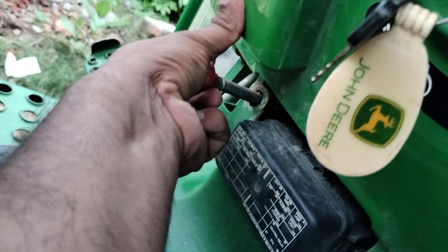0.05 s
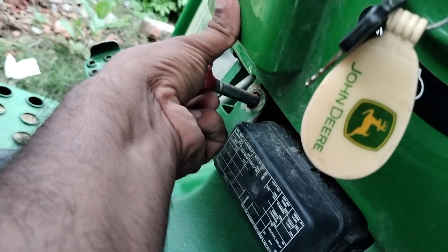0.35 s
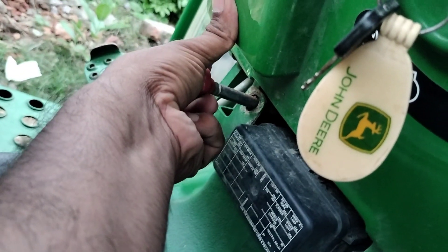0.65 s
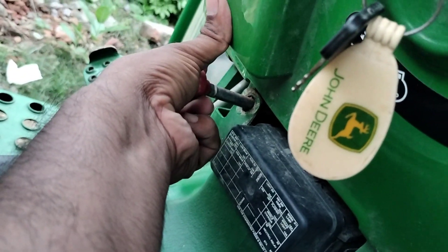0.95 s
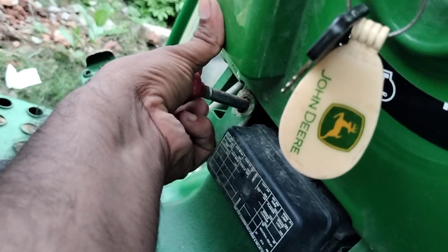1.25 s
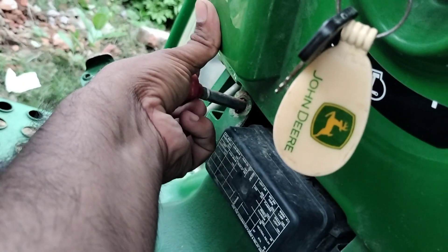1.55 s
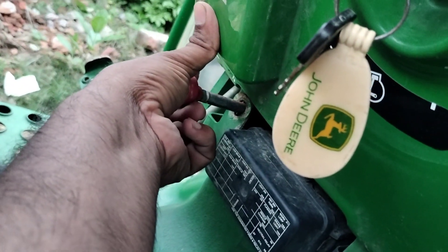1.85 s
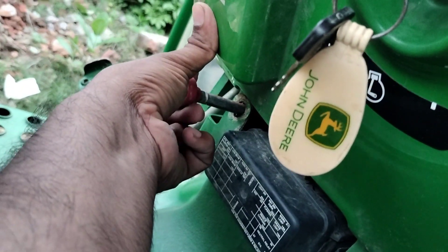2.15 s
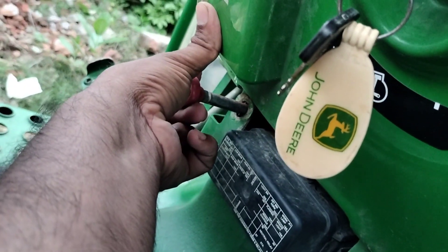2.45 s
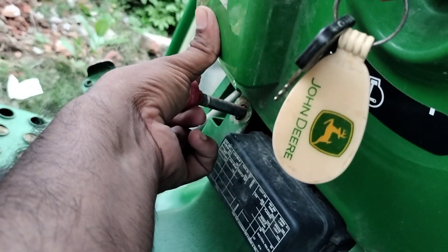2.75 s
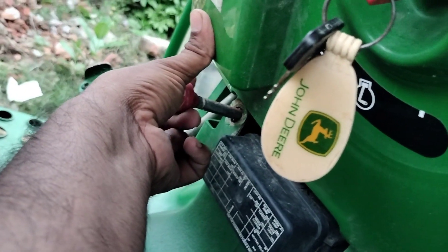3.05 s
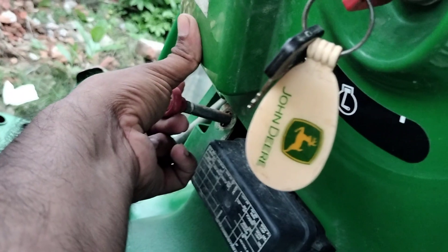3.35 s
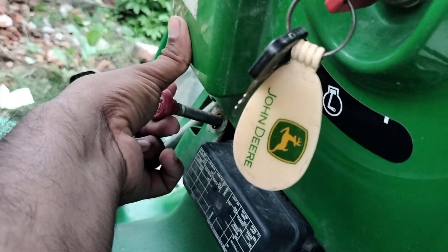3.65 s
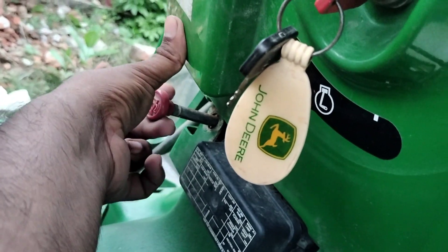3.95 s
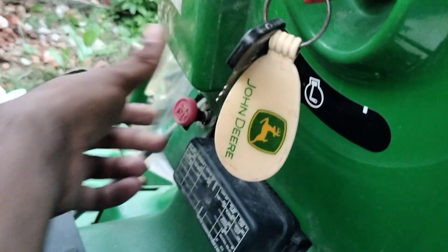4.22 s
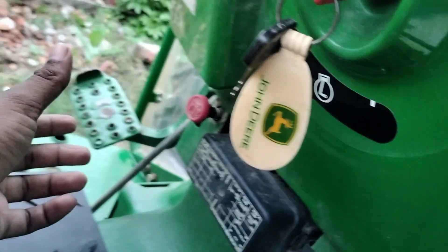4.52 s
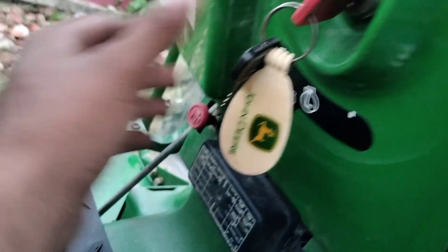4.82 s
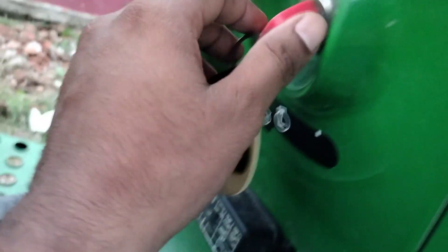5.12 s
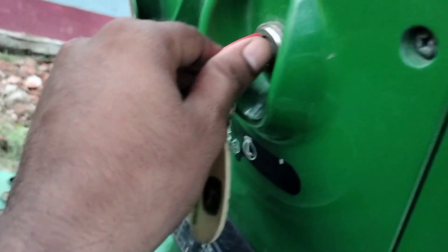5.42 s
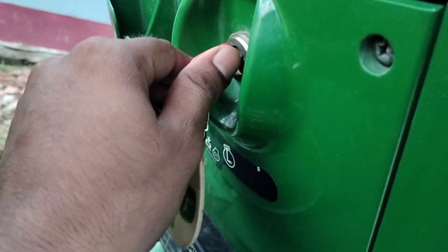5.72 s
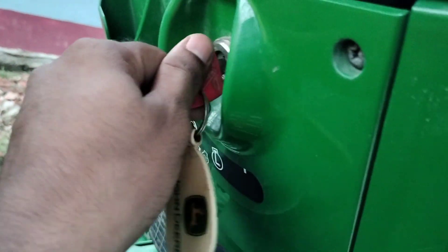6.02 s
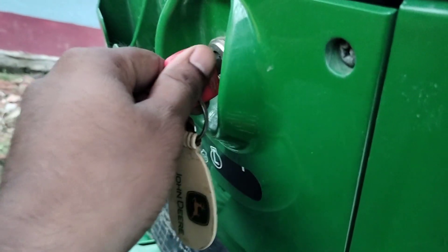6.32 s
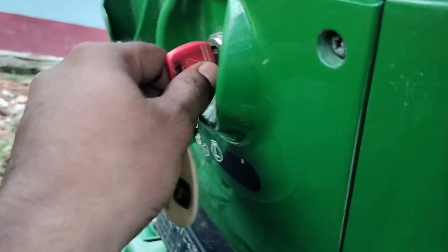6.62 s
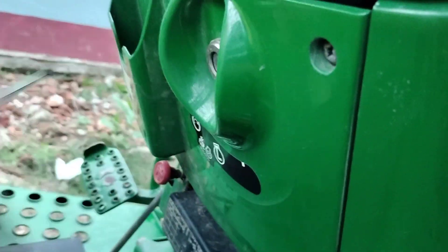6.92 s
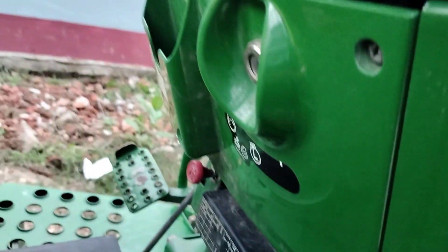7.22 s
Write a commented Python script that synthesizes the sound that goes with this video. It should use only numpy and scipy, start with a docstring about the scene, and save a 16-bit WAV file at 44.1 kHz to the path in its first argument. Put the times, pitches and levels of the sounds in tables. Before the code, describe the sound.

A tractor's clattering diesel engine slows to a stop, then a knob scrapes home and a key clicks out of the ignition.

```python
"""A clacking tractor diesel coasts to a stop, heard at the dashboard; the stop knob has cut its fuel.
Gear backlash slams shut around each compression, ever more slowly, until the crank rocks back and rests.
The released knob's rod scrapes home by stick-slip and leaves its spring ringing.
Then the key is switched off and pulled out: lock clicks shake the dashboard and the key ring jingles."""
import sys
import numpy as np
from scipy import signal
from scipy.fft import rfft, irfft
from scipy.io import wavfile
from scipy.ndimage import uniform_filter1d

SR = 44100
rng = np.random.default_rng(int(sys.argv[2]) if len(sys.argv) > 2 else 0)


def generate_wav(sig):
    """Save sig (samples, or channels by samples) to the path in sys.argv[1] as 16-bit PCM at SR."""
    pcm = np.round(np.clip(np.atleast_2d(sig).T, -1, 1) * 32767).astype(np.int16)
    wavfile.write(sys.argv[1], SR, pcm)


N = 320474
TIME = np.arange(N) / SR

# Pistons passing peak compression. Each row: time in seconds, gear clatter in dB, block thud in dB.
CRESTS = [(0.04, -28.5, -28), (0.121, -28, -27.5), (0.205, -28, -26.5), (0.294, -30.5, -30),
          (0.388, -28.5, -25), (0.483, -29.5, -28), (0.585, -31, -32.5), (0.704, -28.5, -24),
          (0.826, -31, -26.5), (0.966, -33, -28.5), (1.128, -30.5, -26.5), (1.336, -33.5, -29),
          (1.573, -45.5, -39.5), (1.838, -45, -44), (2.143, -48.5, -36.5), (2.475, -40.5, -33.5),
          (2.842, -52, -37.5), (3.255, -63, -55), (3.572, -65.5, -50)]
# Engine run-down. Each row: time in seconds, block churn in dB, exhaust and intake boom in dB.
RUN_DOWN = [(0.0, -20.5, -21.5), (0.06, -23.5, -33.5), (0.18, -22.5, -26), (0.79, -30, -36),
            (0.83, -27, -43), (1.14, -31, -32.5), (1.17, -26.5, -39), (1.32, -31.5, -33.5),
            (1.42, -35, -40), (1.85, -36, -39.5), (1.88, -39, -47), (2.22, -40.5, -46),
            (3.46, -49.5, -53.5), (3.48, -52, -68), (3.62, -62, -44.5), (4.05, -58, -50.5)]
# Spectra of dashboard, panel, metal clicks and bright ticks. Each row: frequency in Hz, level in dB.
DASH_SPECTRUM = [(25, -35), (55, -34), (110, -12), (180, 0.5), (260, -3.5), (400, -8), (520, -10.5),
                 (1200, -64)]
PANEL_SPECTRUM = [(250, -15.5), (500, -18), (700, -2.5), (930, -0.5), (1080, -22), (1400, -18.5),
                  (2200, -54.5)]
CLICK_SPECTRUM = [(600, -2), (1400, -2.5), (2200, -1), (3200, -2), (4300, -2.5), (5500, -6.5), (7500, -12),
                  (9500, -26)]
TICK_SPECTRUM = [(4000, 0), (7500, 2), (9000, -10.5), (11000, 1.5), (12500, -6.5), (15500, -2)]
# The knob's return spring. Each row: frequency in Hz, level in dB, T60 in seconds.
SPRING_MODES = [(792, -1.5, 1.7), (796, -2.5, 2.4), (820, -4.5, 1.1), (831, 2, 1.2), (882, -6, 3.3),
                (900, -10, 1.1), (966, -7, 1.3), (993, -11.5, 1.7)]
# Stereo width. Each row: frequency in Hz, side minus mid in dB.
STEREO_WIDTH = [(30, -12), (170, -16), (350, -8.5), (700, -2), (1300, 0), (16000, -0.5)]


def engine():
    """The slowing crank excites the block, the gear train and thin rattling metal."""
    # Each row: frequency in Hz, level in dB.
    block_spectrum = [(70, -63), (160, -10.5), (250, -0.5), (450, -2), (700, -3), (900, -8.5),
                      (1150, -19.5), (2500, -57.5)]
    gear_spectrum = [(300, -24), (800, -0.5), (1200, -2.5), (2000, -2), (3100, -4), (4000, -7),
                     (5500, -23.5), (7000, -32), (9000, -61)]
    rattle_spectrum = [(1500, -27), (4000, 1), (5500, 6), (7000, -1), (8200, -11.5), (9300, -19.5),
                       (12000, -17.5), (16000, -29)]
    # Each row: frequency in Hz, width in Hz, lift in dB.
    block_resonances = [(254.6, 11, 4.5), (394.8, 42.5, 7.55), (439, 21, 3.6), (577, 21, 6.1), (640, 31, 4),
                        (733, 54, 1.8)]
    gear_resonances = [(1290, 20, 4.8), (1405, 19, 8.6), (1690, 220, 3.7), (1970, 24, 6.1), (2487, 68, 4.8),
                       (2860, 51, 1.6), (3120, 84, 2.1)]
    block = body(block_spectrum, block_resonances)
    gears = body(gear_spectrum, gear_resonances, ripple_db=1.5)
    parts = block, gears, body(rattle_spectrum, ripple_db=4)
    return clacks(parts) + loose_panels(parts) + churning(parts)


def clacks(parts):
    """Each stroke throws the backlash twice and seats a valve; clacks get crisper as the crank slows."""
    # Each row: time in seconds, gear clatter in dB, block thud in dB.
    catches = [(0.065, -31, -31), (0.147, -28.5, -32), (0.235, -27.5, -24.5), (0.321, -30, -24.5),
               (0.416, -26.5, -24), (0.516, -26.5, -25), (0.625, -28, -29), (0.745, -28, -28.5),
               (0.874, -27, -29), (1.02, -29, -29), (1.189, -27.5, -23.5), (1.419, -29, -26),
               (1.689, -25, -23.5), (1.988, -32, -29.5), (2.295, -28.5, -24.5), (2.648, -34, -29),
               (3.028, -32.5, -28.5), (3.401, -49.5, -39), (3.775, -66.5, -43.5)]  # the next compression catches the crank
    grazes = [(2.284, -38, -43), (3.005, -44.5, -31.5)]  # teeth touch just before a slow catch
    _, gears, _ = parts
    out, churn = np.zeros((2, N)), run_down_gain(column=1)
    strokes_s = np.gradient([row[0] for row in catches])
    valves_db = -21.5 + 4.5 * rng.standard_normal(len(CRESTS))  # relative to the churn
    for crest, catch, stroke_s, valve_db in zip(CRESTS, catches, strokes_s, valves_db):
        (crest_s, *crest_db), (catch_s, *catch_db) = crest, catch
        fast_slow_s = [0.18, 0.33]
        rise_s = np.interp(stroke_s, fast_slow_s, [0.0021, 0.00042])
        crest_hz = np.interp(stroke_s, fast_slow_s, [1640, 1990])
        catch_hz = np.interp(stroke_s, fast_slow_s, [3020, 1990])
        add(out, crest_s, clack(parts, *crest_db, rise_s, crest_hz))
        add(out, catch_s, clack(parts, *catch_db, rise_s, catch_hz))
        valve_s = catch_s + 0.36 * stroke_s
        tap = blow(gears, valve_db, rise_s=0.0033, t60_s=0.096, tail_db=-16, tail_s=0.38, grain_db=3.5)
        if valve_s < CRESTS[-1][0]:
            add(out, valve_s, np.interp(valve_s, TIME, churn) * tap)
    for at_s, gear_db, thud_db in grazes:
        add(out, at_s, clack(parts, gear_db, thud_db, rise_s=0.001, peak_hz=1990))
    return out


def clack(parts, gear_db, thud_db, rise_s, peak_hz):
    """Backlash slams shut: light parts answer at once, the heavy block milliseconds later."""
    block, gears, rattle = parts
    gears = emphasise(gears, peak_hz, width_hz=550, lift_db=4.5)
    full_clack_db = -28
    rattle_db = -46 + 1.3 * (gear_db - full_clack_db)  # thin metal fades faster than the gears
    thud = blow(block, thud_db, rise_s + 0.0045, t60_s=0.22, tail_db=-16, tail_s=0.56, grain_db=2)
    clatter = blow(gears, gear_db, rise_s, t60_s=0.11, tail_db=-18.5, tail_s=0.42, grain_db=-0.5)
    buzz = blow(rattle, rattle_db, rise_s / 2, t60_s=0.1, tail_db=-30, tail_s=0.3, grain_db=-1)
    return thud + clatter + buzz


def churning(parts):
    """While the crank turns, the block churns, valve gear chatters, pipes boom and the chassis heaves."""
    # Each row: frequency in Hz, level in dB.
    chassis_spectrum = [(10, -18), (25, -16), (52, 4), (68, -5), (110, -51), (300, -84)]
    pipe_spectrum = [(35, -36.5), (65, -6), (85, -1.5), (150, -0.5), (200, -2.5), (300, -16.5), (900, -68)]
    # Each row: frequency in Hz, width in Hz, lift in dB.
    pipe_resonances = [(75.7, 6.1, 5.4), (119, 6.3, 4.7), (149.3, 20, 6.2)]
    block, gears, rattle = parts
    churn_gain, boom_gain = run_down_gain(column=1), run_down_gain(column=2)
    chatter = gain(-36.5) * steady(gears, grain_db=4, grain_s=0.005)
    chatter += gain(-51) * steady(rattle, grain_db=6.5, grain_s=0.0024)
    running_db, chatter_power = -25.5, 1.38  # chatter dies sooner than the churn
    chatter *= (churn_gain / gain(running_db)) ** chatter_power
    chatter *= held(0, 3.22, attack_s=1, release_s=0.088)
    heave_db = 4 * np.cos(2 * np.pi * (stroke_phase() - 0.81))
    speed = uniform_filter1d(np.gradient(stroke_phase()), size=8000).clip(0)
    shake = gain(-34 + heave_db) * steady(body(chassis_spectrum), grain_db=4, grain_s=0.033)
    shake *= (speed / speed.max()) ** 2
    churn = gain(-2) * churn_gain * steady(block, grain_db=2.5, grain_s=0.008)
    churn *= held(0, 3.28, attack_s=1, release_s=0.22)
    pipes = body(pipe_spectrum, pipe_resonances)
    boom = gain(1) * boom_gain * steady(pipes, grain_db=-1.5, grain_s=0.015)
    return churn + boom + chatter + shake


def loose_panels(parts):
    """Sheet metal, shaken by the engine, buzzes against the frame."""
    # Each row: start in seconds, level in dB.
    bursts = [(0.276, -42), (0.357, -37.5), (0.445, -45.5), (0.691, -45.5), (1.249, -43.5), (1.279, -56),
              (1.366, -46.5), (1.955, -56.5), (2.174, -61.5), (2.606, -63), (3.174, -70)]
    block, gears, rattle = parts
    out = np.zeros((2, N))
    for at_s, db in bursts:
        buzz = blow(rattle, db, rise_s=0.0013, t60_s=0.1, tail_db=-24, tail_s=0.3, grain_db=-1.5)
        clatter = blow(gears, db + 4, rise_s=0.0026, t60_s=0.16, tail_db=-12, tail_s=0.43, grain_db=0.5)
        thud = blow(block, db + 12, rise_s=0.014, t60_s=0.23, tail_db=-20, tail_s=0.36, grain_db=2.5)
        add(out, at_s, buzz + clatter + thud)
    return out


def rocking():
    """The crank is thrown back and the engine lurches, each time in one low chassis mode."""
    # Each row: start in seconds, pitch in Hz, level in dB.
    lurches = [(1.754, 74, -34), (3.04, 85.8, -45.5), (3.189, 73, -49), (3.6, 90, -43), (3.8, 85.2, -39.5),
               (3.94, 82.6, -47)]
    out, t = np.zeros((2, N)), np.arange(SR // 2) / SR
    peak_s = 0.03
    swell = t / peak_s * np.exp(1 - t / peak_s)
    for at_s, hz, db in lurches:
        add(out, at_s, np.outer([1, 0.1], gain(db) * swell * np.sin(2 * np.pi * hz * t)))
    return out


def stop_knob():
    """The rod sticks and slips through its guide, squeals and hits home; the return spring rings on."""
    # Each row: frequency in Hz, level in dB.
    rod_spectrum = [(100, -22), (220, 8.5), (600, -23), (950, 10.5), (1150, -27), (1550, -15), (2000, -2),
                    (3000, -4), (3700, -13), (4200, -6), (6000, -11), (8200, -25), (9300, -33),
                    (12500, -21), (16000, -41)]
    # Each row: frequency in Hz, level in dB, T60 in seconds.
    rod_modes = [(425.4, 2.5, 0.23), (648.5, -2, 0.26), (804, -1.5, 0.17), (870, -14, 0.11),
                 (1277, -2, 0.12), (2365, -9.5, 0.19), (2900, -7.5, 0.1), (3360, -18.5, 0.3),
                 (4090, -6, 0.081), (4170, -7.5, 0.079), (5340, -12, 0.081), (6000, -14, 0.063),
                 (8000, -11.5, 0.04), (11500, -20, 0.046), (12700, -28, .08), (13620, -29, 0.16),
                 (14500, -29, .07)]
    creep_s, bind_s, free_s, home_s = 4.09, 4.164, 4.175, 4.218
    creep = held(creep_s, home_s, attack_s=0.022, release_s=0.072)
    slide = held(free_s, home_s, attack_s=0.0045, release_s=0.016)
    jolts = gain(-26.5) * held(free_s, free_s, attack_s=0.0025, release_s=0.0072)
    jolts += gain(-20) * held(home_s, home_s, attack_s=0.0067, release_s=0.015)
    shudder = gain(-45) * held(home_s, home_s, attack_s=0.005, release_s=0.054)
    friction = gain(-57) * creep + gain(-28) * slide + jolts + shudder
    scrape = friction * steady(body(rod_spectrum), grain_db=2.5, grain_s=0.002)
    # Low modes groan once the rod binds; high ones need it to run free.
    low_drive = gain(-46.5) * creep + gain(-19.5) * held(bind_s, home_s, attack_s=0.0095, release_s=0.012)
    high_drive = slide + gain(-30) * creep
    slips, squeal = contacts(N, grain_db=3.5, grain_s=0.0028), np.zeros((2, N))
    for hz, db, t60_s in rod_modes:
        drive = low_drive if hz < 2000 else high_drive
        mode = through(slips * drive, ringing([(hz, db, t60_s)])[:, :SR // 2])
        squeal += gain(db) * mode / rms(mode[0])
    out = gain(-4.5) * scrape + gain(-3.5) * squeal * rms(low_drive) / rms(squeal[0])
    tick = blow(body(TICK_SPECTRUM), db=-36.5,
                rise_s=0.0053, t60_s=0.083, tail_db=-25, tail_s=0.2, grain_db=-2)
    thud = blow(body(DASH_SPECTRUM), db=-34.5,
                rise_s=0.0097, t60_s=0.36, tail_db=-12, tail_s=0.59, grain_db=-2)
    add(out, free_s - 0.006, from_left(tick))
    add(out, home_s - 0.015, thud)
    add(out, home_s, gain(-44) * ringing(SPRING_MODES))
    return out


def key():
    """The detent snaps and the key ratchets out; lock and fingers shake the dashboard, the ring ticks."""
    # Each row: frequency in Hz, width in Hz, lift in dB.
    dash_resonances = [(185, 46, 2.4), (260, 25, 8.3), (346, 3.7, 2.4)]
    panel_resonances = [(583, 13, 10.7), (737.4, 27, 11.1), (803, 6.7, 5.5), (874, 11, 3), (925, 64, 4.8),
                        (1356, 29, 8.5)]
    # Each row: start in seconds, then thud, panel, click and tick in dB, then click rise in seconds.
    lock_clicks = [(4.941, -37.5, -36, -45.5, -71, 0.0003), (5.111, -51, -50.5, -56.5, -77, 0.0005),
                   (5.894, -26, -23.5, -32, -42, 0.0082), (5.908, -19, -17.5, -31, -31, 0.00081),
                   (6.646, -41, -35.5, -56.5, -88, 0.00026), (6.69, -32.5, -34, -55, -75, 0.0044),
                   (6.734, -37.5, -48, -56.5, -73, 0.0005), (6.767, -32.5, -32.5, -43, -38.5, 0.0007),
                   (6.787, -33.5, -24, -33.5, -31.5, 0.0013)]
    # Each row: start in seconds, level in dB.
    finger_bumps = [(5.143, -43), (5.234, -40.5), (5.359, -45), (5.815, -43.5), (6.548, -43), (6.567, -44)]
    # Hanging ring and fob. Each row: start in seconds, click in dB, tick in dB.
    ring_ticks = [(4.788, -80, -66), (4.845, -83, -64), (5.018, -69, -65), (6.95, -51, -69),
                  (7.067, -61.5, -82)]
    dash, panel = body(DASH_SPECTRUM, dash_resonances), body(PANEL_SPECTRUM, panel_resonances)
    out, spring = np.zeros((2, N)), ringing(SPRING_MODES)
    for at_s, thud_db, panel_db, click_db, tick_db, rise_s in lock_clicks:
        thud = blow(dash, thud_db, rise_s + 0.0049, t60_s=0.076, tail_db=-23.5, tail_s=0.53, grain_db=2.5)
        knock = blow(panel, panel_db, rise_s + 0.00083, t60_s=0.076, tail_db=-24, tail_s=0.27, grain_db=-4)
        # Key, pins and ring touch in a new place each time.
        click = blow(body(CLICK_SPECTRUM, ripple_db=3), click_db,
                     rise_s, t60_s=0.068, tail_db=-30, tail_s=0.31, grain_db=4.5)
        tick = blow(body(TICK_SPECTRUM, ripple_db=3), tick_db,
                    rise_s, t60_s=0.036, tail_db=-36, tail_s=0.13, grain_db=2)
        add(out, at_s, thud + knock + click + from_left(tick))
        add(out, at_s, gain(panel_db - 31.5) * spring)  # the knob's spring rings in sympathy
    for at_s, db in finger_bumps:
        thud = blow(dash, db, rise_s=0.005, t60_s=0.095, tail_db=-12, tail_s=0.57, grain_db=-2.5)
        knock = blow(panel, db - 9, rise_s=0.004, t60_s=0.094, tail_db=-19, tail_s=0.5, grain_db=-2.5)
        click = blow(body(CLICK_SPECTRUM), db - 29.5,
                     rise_s=0.0031, t60_s=0.08, tail_db=-15, tail_s=0.5, grain_db=3)
        add(out, at_s, thud + knock + click)
    for at_s, click_db, tick_db in ring_ticks:
        click = blow(body(CLICK_SPECTRUM, ripple_db=1), click_db,
                     rise_s=0.00049, t60_s=0.071, tail_db=-33, tail_s=0.27, grain_db=0)
        tick = blow(body(TICK_SPECTRUM, ripple_db=3), tick_db,
                    rise_s=0.00056, t60_s=0.023, tail_db=-36, tail_s=0.13, grain_db=-6)
        add(out, at_s, click + from_left(tick))
    return out


def finger_creaks():
    """Fingers gripping the key creak in short soft tones."""
    # Each row: start in seconds, pitch in Hz, level in dB, length in seconds.
    creaks = [(5.759, 357.5, -28.5, 0.019), (5.858, 342, -29.5, 0.035), (7.2, 296, -34, 0.021)]
    out = np.zeros((2, N))
    for at_s, hz, db, length_s in creaks:
        t = np.arange(round(length_s * SR)) / SR
        tone = gain(db) * np.sin(np.pi * t / length_s) * np.sin(2 * np.pi * hz * t)
        add(out, at_s, np.outer([1, -0.2], tone))
    return out


def jingle():
    """The steel ring strikes the key once as it starts to slide out."""
    # Each row: frequency in Hz, level in dB, T60 in seconds.
    ring_modes = [(10650, 0, 0.075), (11300, -5, 0.092), (14100, -17, .1)]
    out = np.zeros((2, N))
    add(out, at_s=6.694, sound=gain(-49) * from_left(ringing(ring_modes)))
    return out


def hand_rub():
    """The hand rubs along the dashboard as it takes hold of the key."""
    rub = gain(-54.5) * steady(body(PANEL_SPECTRUM), grain_db=7.5, grain_s=0.02)
    rub += gain(-61.5) * steady(body(CLICK_SPECTRUM), grain_db=3.5, grain_s=0.01)
    return held(5.37, 5.58, attack_s=0.008, release_s=0.15) * rub


def gear_whine():
    """Meshing timing gears sing faintly and raggedly, sagging at each crest and speeding up between."""
    crest_hz, swing_hz, flutter_hz = 1440, 374, 36
    swing = abs(np.sin(np.pi * stroke_phase()))
    phase = 2 * np.pi * np.cumsum(crest_hz + swing_hz * swing) / SR
    noise = rng.standard_normal((2, N)) + 1j * rng.standard_normal((2, N))
    flutter = signal.sosfilt(signal.butter(2, flutter_hz, fs=SR, output="sos"), noise)
    small_gear = flutter * np.exp(1j * phase)
    large_gear = gain(-8) * flutter[::-1] * np.exp(0.58j * phase)
    tone = (small_gear + large_gear).real
    return gain(-68.5 + 7.3 * swing) * held(2.06, 3.23, attack_s=0.14, release_s=0.17) * tone / rms(tone)


def air():
    """Still outdoor air and faint hiss; the level wavers, and dips as the engine comes to rest."""
    # Each row: frequency in Hz, level in dB.
    air_spectrum = [(20, -7), (90, 0), (150, -2), (230, -3), (370, 0.5), (550, -4.5), (850, -9.5),
                    (1150, -25), (1600, -23), (2500, -24.5), (5500, -30.5), (7500, -33), (9200, -46.5),
                    (16000, -40)]
    # Each row: frequency in Hz, width in Hz, lift in dB.
    hiss_peaks = [(6570, 580, 12.9), (10320, 1070, 14.7)]
    dip_db = -4 * held(3.07, 4.05, attack_s=0.065, release_s=0.098)
    return gain(-51 + dip_db) * steady(body(air_spectrum, hiss_peaks), grain_db=2.5, grain_s=0.12)


def stroke_phase():
    """Strokes turned so far: a whole number at each crest."""
    return np.interp(TIME, [row[0] for row in CRESTS], np.arange(len(CRESTS)))


def run_down_gain(column):
    """One dB column of the run-down as a gain; silent after its end."""
    rows = np.array(RUN_DOWN)
    return gain(np.interp(TIME, rows[:, 0], rows[:, column], right=-120))


def body(spectrum, resonances=(), ripple_db=0, size=8192):
    """Minimum-phase mid and side response of a part; random ripple stands for its many weak modes."""
    hz = abs(np.fft.fftfreq(size, 1 / SR))
    peaks_db = sum(lift / (1 + (2 * (hz - centre) / width) ** 2) for centre, width, lift in resonances)
    mid_db = db_at(spectrum, hz) + peaks_db
    side_db = mid_db + db_at(STEREO_WIDTH, hz)
    grid_hz = np.linspace(0, SR / 2, size // 12)
    ripple = [ripple_db * np.interp(hz, grid_hz, rng.standard_normal(len(grid_hz))) for _ in range(2)]
    log_gain = np.log(gain([mid_db + ripple[0], side_db + ripple[1]]))
    return np.fft.ifft(np.exp(np.conj(signal.hilbert(log_gain)))).real[:, :size // 2]


def emphasise(response, hz, width_hz, lift_db):
    """Where a blow lands decides which resonances answer most."""
    band = signal.lfilter(*signal.iirpeak(hz, hz / width_hz, SR), response)
    return response + (gain(lift_db) - 1) * band


def ringing(modes):
    """Mid and side response of freely decaying modes."""
    t = np.arange(2 * SR) / SR
    out = np.zeros((2, len(t)))
    for hz, db, t60_s in modes:
        phase = 2 * np.pi * (hz * t + rng.random())
        side_gain = gain(db_at(STEREO_WIDTH, hz))
        out += gain(db - 60 * t / t60_s) * np.array([np.sin(phase), side_gain * np.cos(phase)])
    return out


def contacts(size, grain_db, grain_s):
    """Countless tiny impacts: noise in random clumps."""
    t = np.arange(size) / SR
    clumps = np.interp(t / grain_s, np.arange(size // 32), rng.standard_normal(size // 32))
    return rng.standard_normal((2, size)) * gain(grain_db * clumps)


def blow(response, db, rise_s, t60_s, tail_db, tail_s, grain_db):
    """A blow chatters briefly into a part; the bodywork carries a longer tail with a T60 of tail_s."""
    t = np.arange(SR // 2) / SR
    attack = 1 - np.exp(-(t / rise_s) ** 2)
    decay = np.hypot(gain(-60 * t / t60_s), gain(tail_db - 60 * t / tail_s))
    hit = through(contacts(len(t), grain_db, grain_s=0.002) * attack * decay, response)
    return gain(db) * hit / rms(hit[0, t < 0.03])


def steady(response, grain_db, grain_s):
    """A part kept sounding by tiny impacts, at unit mid RMS."""
    sound = through(contacts(N, grain_db, grain_s), response)
    return sound / rms(sound[0])


def held(start_s, end_s, attack_s, release_s):
    """Exponential swell up to start_s, hold until end_s, exponential decay."""
    return np.exp(-np.maximum(start_s - TIME, 0) / attack_s - np.maximum(TIME - end_s, 0) / release_s)


def from_left(sound):
    """The highest sounds beam to the left."""
    mid, side = sound
    return np.array([mid, 0.69 * mid + 0.98 * side])


def db_at(spectrum, hz):
    """A spectrum interpolated over log frequency."""
    points_hz, points_db = np.transpose(spectrum)
    return np.interp(np.log(hz + 1), np.log(points_hz + 1), points_db)


def through(x, response):
    return signal.fftconvolve(x, response, axes=1)[:, :x.shape[1]]


def add(mix, at_s, sound):
    part = mix[:, max(round(at_s * SR), 0):][:, :sound.shape[1]]
    part += sound[:, :part.shape[1]]


def gain(db):
    return 10 ** (np.asarray(db) / 20)


def rms(x):
    return np.sqrt(np.mean(x ** 2) + 1e-20)


def scene():
    """Sources summed as mid and side, returned as left and right."""
    machine = engine() + rocking() + gear_whine()
    controls = stop_knob() + hand_rub() + key() + jingle() + finger_creaks()
    mid, side = machine + controls + air()
    return np.array([mid + side, mid - side])


def record(dry):
    """The right channel is duller in the top octave; peaks are rounded off, then the band is limited."""
    # Each row: frequency in Hz, left minus right in dB.
    balance = [(100, 1), (350, -1), (700, 2), (2500, -1.9), (6500, -2.5), (8200, 13), (10000, 3.5),
               (14000, 1)]
    ceiling, cutoff_hz = 0.82, 15900
    hz = np.fft.rfftfreq(N, 1 / SR)
    pan = gain(np.outer([0.5, -0.5], db_at(balance, hz)))
    panned = irfft(rfft(dry) * pan / np.sqrt(np.mean(pan ** 2, 0)), N)
    rounded = panned / (1 + (panned / ceiling) ** 6) ** (1 / 6)
    lowpass = signal.firwin(511, cutoff_hz, window=("kaiser", 9), fs=SR)
    return signal.oaconvolve(rounded, lowpass[None], "same")


dry = scene()
out = record(dry)
generate_wav(out)
```